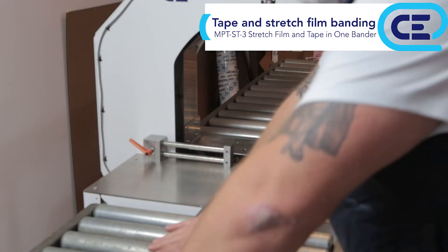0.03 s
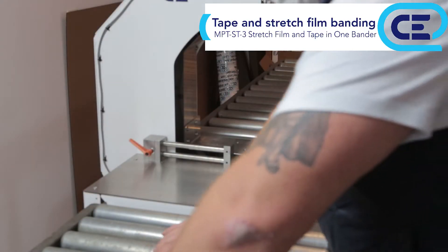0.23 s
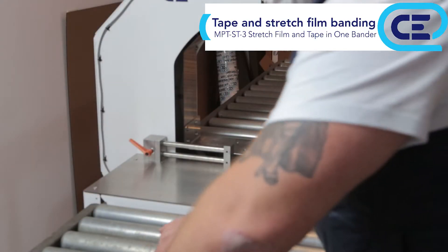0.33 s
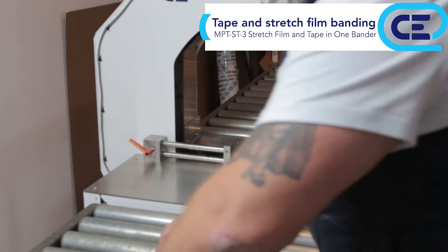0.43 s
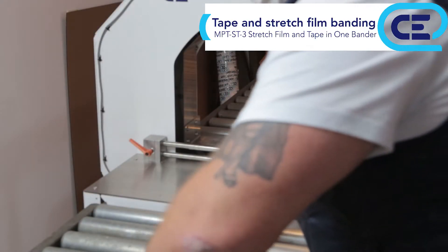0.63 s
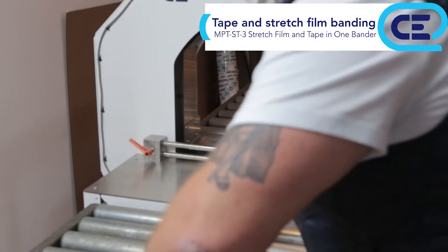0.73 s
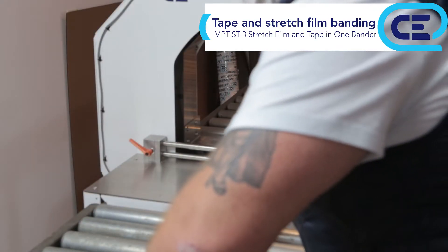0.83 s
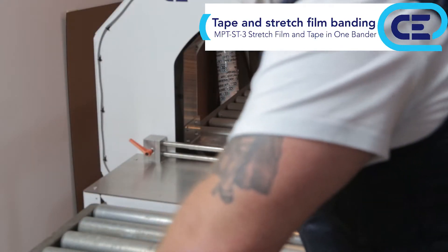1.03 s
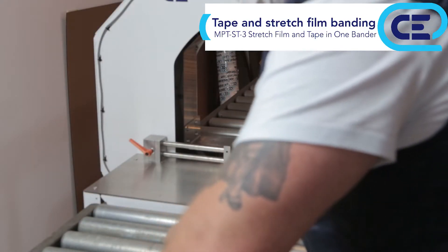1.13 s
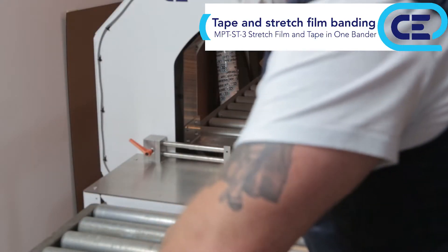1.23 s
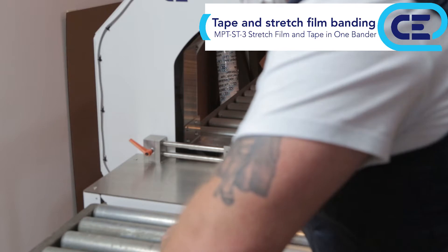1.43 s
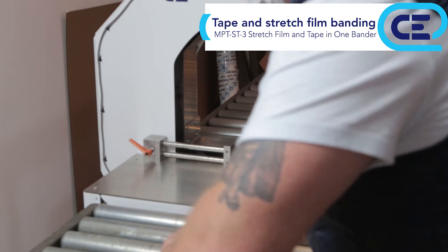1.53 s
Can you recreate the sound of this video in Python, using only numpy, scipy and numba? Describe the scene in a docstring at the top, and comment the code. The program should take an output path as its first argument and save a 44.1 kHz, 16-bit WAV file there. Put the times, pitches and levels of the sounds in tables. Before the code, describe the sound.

Sharp metal clacks come quickly from a nearby banding machine, ending in a loud blow. A load rubs and knocks on a roller conveyor, then more clacks and a faint rattle sound over the hard-walled workshop's low hum.

```python
"""In a hard-walled workshop, close to a banding machine, metal parts clack in three bursts.
Each impact excites the damped modes of panels and frame; heavy blows set a steel tube ringing.
Light ticks and the pings of a small steel part fall between, and a loose fitting rattles near the end.
A load rubs and knocks along a roller conveyor over a low motor hum and steady air noise.
The hall reverberates with the impacts, and a limiter ducks the sound after the hardest blow."""
import sys
import numpy as np
from scipy import signal
from scipy.fft import rfft, irfft
from scipy.io import wavfile
from scipy.ndimage import uniform_filter1d
from numba import njit

SR = 44100
rng = np.random.default_rng(int(sys.argv[2]) if len(sys.argv) > 2 else 0)


def transcribe(signal):
    """Save signal, clipped to [-1, 1], as a 16-bit WAV file at the path in sys.argv[1]."""
    frames = np.atleast_2d(signal).T
    limited = np.clip(frames, -1, 1)
    pcm = np.round(limited * 32767).astype(np.int16)
    wavfile.write(sys.argv[1], SR, pcm)


N = 70560
T = np.arange(N) / SR

# motor tones: (frequency [Hz], level [dB])
HUM_TONES = [(101, -85), (133, -58.5)]
# air noise: (frequency [Hz], relative density [dB])
AIR_SPECTRUM = [(20, 1), (55, 6.5), (110, 18.5), (220, 8), (330, -1.5), (1300, -18), (4000, 0.5),
                (8000, -8.5), (13000, -10.5), (16000, -26)]
# envelope of the sliding load: (time [s], level [dB])
SLIDE_ENVELOPE = [(0, -34.5), (0.04, -44), (0.075, -37), (0.15, -34.5), (0.28, -34), (0.42, -30.5),
                  (0.56, -42.5), (0.70, -42.5), (0.83, -41), (0.97, -52.5), (1.21, -51), (1.262, -32),
                  (1.40, -41), (1.53, -43.5), (1.6, -46)]
# friction noise: (frequency [Hz], relative density [dB])
SLIDE_SPECTRUM = [(100, -32), (300, -1), (650, 4), (1300, 4.5), (3000, 3.5), (6000, -7), (10000, -14),
                  (16000, -26)]
# metal impacts: (time [s], crack [dB], panel [dB], frame [dB], bass shelf [dB], treble shelf [dB])
CLACKS = [(0.1023, -41, -37, -33, -13, -22), (0.158, -22.5, -25, -23, 0, -8),
          (0.1628, -38, -24.5, -26, -15, 2.5), (0.1756, -14.5, -20.5, -20, -7, -5),
          (0.179, -28, -28.5, -31, -14, 9.5), (0.1925, -13.5, -19, -33, -7, 2),
          (0.1972, -11.5, -28.5, -21, 1.5, 0), (0.2428, -44, -31, -33, -14, 2.5),
          (0.249, -28.5, -33, -42, -14, 2), (0.2921, -21, -20, -18.5, -2.5, -1),
          (0.3209, -39, -26, -24, 5, 5.5), (0.3404, -47, -19.5, -24, 2, -4),
          (0.3656, -17, -13.5, -13, -4, -6.5), (0.3723, -31, -14.5, -25, -7, 1.5),
          (0.3765, -14, -16, -16.5, 0.5, -14), (0.396, 2.5, -8, -10.5, -0.5, 2),
          (1.2643, -35, -34.5, -50, 15.5, -7), (1.275, -22, -25, -44, 11.5, 14),
          (1.2838, -17.5, -27.5, -52, 4.5, 10), (1.3012, -21, -24.5, -44, -12, 2.5),
          (1.308, -18.5, -26, -19, -4, -17)]
# crack and panel ring: (frequency [Hz], relative density [dB])
CLACK_SPECTRUM = [(50, -57), (330, -18), (600, -20), (1000, -1), (1800, -3), (3000, 1.5), (4700, -4),
                  (8800, -10), (12000, -13.5), (16000, -25.5)]
# modes of the machine frame: (frequency [Hz], relative level [dB], T60 [s])
FRAME_MODES = [(1558, -2, 0.066), (1831, 5, 0.053), (2280, 6, 0.043), (2468, 2, 0.064), (2920, 1, 0.047),
               (2974, 10.5, 0.04), (3267, 5, 0.087), (3560, -9, 0.081), (3880, -3, 0.087), (4180, -2, 0.11),
               (5400, 0, 0.061), (7420, -9, 0.051)]
# reverberation: (frequency [Hz], relative density [dB])
ROOM_SPECTRUM = [(100, -11), (350, 1), (650, -1), (1400, 3), (3000, -1), (6000, 2), (9000, -4), (16000, -7)]
# resonances of the struck spots: (time [s], level [dB], centre frequency [Hz])
SPOT_RESONANCES = [(0.158, -29, 3370), (0.1752, -21, 890), (0.196, -13, 3360), (0.1972, -30, 860),
                   (0.396, -12, 649), (0.3962, -5, 2300), (1.275, -22, 646), (1.281, -20, 1020),
                   (1.3005, -35, 3260), (1.308, -16, 2930)]
# blows on the tube: (time [s], level [dB])
TUBE_BLOWS = [(0.397, -41), (1.308, -31)]
# modes of the tube: (frequency [Hz], relative level [dB], T60 [s])
TUBE_MODES = [(1810, -2, 2.2), (1913, 2, .5), (2664, 2.5, .38), (2798, -.5, .3), (2930, -4, .3),
              (5138, 2, .28)]
# light contacts: (time [s], level [dB])
TICKS = [(0.492, -27.5), (0.498, -29.5), (0.785, -27), (0.868, -23.5), (1.167, -36.5), (1.1902, -29),
         (1.245, -26), (1.5652, -30.5)]
# a light contact: (frequency [Hz], relative density [dB])
TICK_SPECTRUM = [(200, -26), (1000, -8), (2200, -0.5), (4000, 4), (7000, 4.5), (9500, 2), (13000, -1.5),
                 (16000, -15)]
# blows on the small steel part: (time [s], ring level [dB], tick level [dB], pitch [ratio])
PINGS = [(0.7213, -45, -28, 0.95), (0.7243, -26, -48, 1.02), (0.8968, -28, -26, 0.982),
         (0.930, -37.5, -32, 0.985)]
# modes of the small part: (frequency [Hz], relative level [dB], T60 [s])
PING_MODES = [(2262, 4, 0.045), (4090, -3, 0.042), (6120, 2.5, 0.037), (6540, -9, 0.098),
              (8130, -1.5, 0.033), (9600, -6, 0.036), (11400, -11, 0.055), (14200, -16, .05)]
# contacts of load and conveyor: (time [s], level [dB])
KNOCKS = [(0.751, -28.5), (0.759, -30.5), (0.793, -36), (0.838, -35.5), (0.867, -25.5), (0.88, -42),
          (1.332, -25), (1.352, -26.5)]
# a dull knock: (frequency [Hz], relative density [dB])
KNOCK_SPECTRUM = [(100, 1), (350, -3), (650, 0.5), (1500, 1.5), (3500, -2), (7000, -13), (16000, -35)]
# contacts of the loose fitting: (time [s], level [dB])
RATTLES = [(1.137, -54), (1.426, -42), (1.486, -36.5), (1.515, -39), (1.539, -36), (1.553, -38),
           (1.565, -34)]
# resonances of the fitting: (frequency [Hz], relative density [dB])
RATTLE_SPECTRUM = [(500, -28), (2200, -1), (4200, -5), (5400, 0.5), (7500, 6), (9000, -1.5), (16000, -10)]


def undb(db):
    """Amplitude ratio of a level in decibels."""
    return 10 ** (np.asarray(db) / 20)


def decay(t60, hold_s=0):
    """Exponential decay: unity until hold_s, then 60 dB down in every t60 seconds."""
    return np.exp(-np.log(1000) * np.maximum(T - hold_s, 0) / t60)


def at(start, x):
    """Time shift of a sound to its onset."""
    return np.concatenate([np.zeros(int(start * SR)), x])[:N]


def butterworth(x, order, hz, kind):
    """Filtering with a maximally flat passband."""
    return signal.sosfilt(signal.butter(order, hz, kind, fs=SR, output="sos"), x)


def match_energy(x, envelope):
    """Normalisation of a burst to the energy of an envelope."""
    return x * np.sqrt(np.sum(envelope ** 2) / np.sum(x ** 2))


def wander(rate_hz):
    """Smooth random fluctuation of unit standard deviation."""
    width = int(SR / rate_hz)
    steps = np.repeat(rng.standard_normal(N // width + 1), width)
    smooth = uniform_filter1d(uniform_filter1d(steps, width), width)[:N]
    return smooth / smooth.std()


def noise(spectrum):
    """Spectral shaping of white noise, at an rms near 1."""
    hz, db = np.array(spectrum).T
    gain = undb(np.interp(np.log(np.fft.rfftfreq(N, 1 / SR) + 1), np.log(hz), db))
    gain /= np.sqrt(np.mean(gain ** 2))
    return irfft(rfft(rng.standard_normal(N)) * gain, N)


def dense_ring(spectrum, t60, damping):
    """Overlapping modes act as decaying noise; t60 holds at 2 kHz and goes as frequency ** -damping."""
    bins = rfft(noise(spectrum))
    octave = np.clip(np.log2((np.fft.rfftfreq(N, 1 / SR) + 1) / 2000), -3, 3)
    out = 0
    for k in range(-3, 4):
        band = irfft(bins * np.maximum(1 - abs(octave - k), 0), N)
        out += band * decay(t60 * 2 ** (-k * damping))
    return out


def ring(modes, detune=0):
    """Modal superposition: damped sinusoids of random phase, with an initial rms near 1."""
    out = 0
    for hz, db, t60 in modes:
        hz *= 1 + detune * rng.standard_normal()
        out += undb(db) * decay(t60) * np.sin(2 * np.pi * (hz * T + rng.random()))
    return out / np.sqrt(sum(undb(db) ** 2 for _, db, _ in modes) / 2)


def air(level_db=-49.5):
    """Stationary broadband noise of the air, strongest in the bass."""
    return undb(level_db) * noise(AIR_SPECTRUM)


def motor_hum(drift_hz=4.76, waver_db=4.5):
    """Random frequency and amplitude modulation makes the motor's tones waver."""
    out = 0
    for hz, db in HUM_TONES:
        phase = 2 * np.pi * np.cumsum(hz + drift_hz * wander(15)) / SR
        out += np.sqrt(2) * undb(db + waver_db * wander(15.5)) * np.sin(phase)
    return out


def sliding_load(roughness_db=2):
    """Uneven sliding friction on the conveyor radiates noise of fluctuating level."""
    times, db = np.array(SLIDE_ENVELOPE).T
    return noise(SLIDE_SPECTRUM) * undb(np.interp(T, times, db) + roughness_db * wander(rate_hz=130))


def clacks(bass_hz=1090, treble_hz=6400):
    """Impact excitation: metal meets metal with a crack, then panels and frame vibrate freely."""
    contact = decay(t60=0.0049, hold_s=0.0012)
    out = 0
    for start, crack_db, panel_db, frame_db, bass_db, treble_db in CLACKS:
        crack = undb(crack_db) * match_energy(noise(CLACK_SPECTRUM) * contact, contact)
        panel = undb(panel_db) * dense_ring(CLACK_SPECTRUM, t60=0.095, damping=0.084)
        frame = undb(frame_db) * ring(FRAME_MODES, detune=0.006)
        blow = crack + panel + frame
        bass_shelf = (undb(bass_db) - 1) * butterworth(blow, 1, bass_hz, "low")
        treble_shelf = (undb(treble_db) - 1) * butterworth(blow, 1, treble_hz, "high")
        out += at(start, blow + bass_shelf + treble_shelf)
    return butterworth(out, 2, 170, "high")


def workshop_echo(x, build_s=0.0012):
    """Diffuse reverberation: convolution with the hall's impulse response, scaled to unit energy."""
    response = dense_ring(ROOM_SPECTRUM, t60=0.76, damping=0.29) * (1 - np.exp(-T / build_s))
    return signal.fftconvolve(x, response / np.sqrt(np.sum(response ** 2)))[:N]


def spot_resonances(width_octaves=0.61):
    """Heavy damping broadens a resonance: struck panels give brief hollow knocks and bright bites."""
    envelope = decay(t60=0.023)
    out = 0
    for start, db, hz in SPOT_RESONANCES:
        edges_hz = hz * 2 ** (np.array([-0.5, 0.5]) * width_octaves)
        burst = butterworth(rng.standard_normal(N) * envelope, 3, edges_hz, "band")
        out += at(start, undb(db) * match_energy(burst, envelope))
    return out


def steel_tube(touch_s=1.58):
    """Lightly damped modes ring on after heavy blows until a touch adds damping."""
    ringing = sum(at(start, undb(db) * ring(TUBE_MODES)) for start, db in TUBE_BLOWS)
    return ringing * decay(t60=0.3, hold_s=touch_s)


def tick(tail_db=-9.5):
    """A short contact has a wide spectrum: one bright click with a faint tail."""
    return noise(TICK_SPECTRUM) * (decay(t60=0.011) + undb(tail_db) * decay(t60=0.078))


def pings():
    """Free vibration of a small steel part after a tick; its pitch depends on how it is held."""
    out = 0
    for start, ring_db, tick_db, pitch in PINGS:
        modes = [(hz * pitch, db, t60) for hz, db, t60 in PING_MODES]
        out += at(start, undb(ring_db) * ring(modes) + undb(tick_db) * tick())
    return out


def knocks(attack_s=0.0012):
    """Soft contacts excite little treble: the load knocks dully on the conveyor."""
    envelope = (1 - np.exp(-T / attack_s)) * decay(t60=0.092)
    out = sum(at(start, undb(db) * noise(KNOCK_SPECTRUM) * envelope) for start, db in KNOCKS)
    return butterworth(out, 2, 374, "high")


def rattles(attack_s=0.00055):
    """Intermittent contact excites the broad resonances of a loose fitting."""
    envelope = (1 - np.exp(-T / attack_s)) * decay(t60=0.077)
    return sum(at(start, undb(db) * noise(RATTLE_SPECTRUM) * envelope) for start, db in RATTLES)


def scene(heavy_echo_db=-14.5, light_echo_db=-16):
    """Superposition of the direct sounds and the echo of the impacts at one microphone."""
    heavy = clacks() + spot_resonances() + knocks()
    ticks = sum(at(start, undb(db) * tick()) for start, db in TICKS)
    light = ticks + pings() + rattles()
    echo = workshop_echo(undb(heavy_echo_db) * heavy + undb(light_echo_db) * light)
    return (heavy + light + echo + steel_tube() + sliding_load() + air() + motor_hum())[None]


@njit
def peak_envelope(rectified, attack_s, release_s):
    """Envelope detection: a first-order lag with separate rise and fall time constants."""
    attack = 1 - np.exp(-1 / (attack_s * SR))
    release = 1 - np.exp(-1 / (release_s * SR))
    out, level = np.empty(len(rectified)), 0.0
    for i, sample in enumerate(rectified):
        level += (sample - level) * (attack if sample > level else release)
        out[i] = level
    return out


def record(dry, threshold_db=-2.5, cutoff_hz=15900):
    """Peak limiting lowers the gain after the hardest blow; overshoot clips, and the top is cut."""
    peak = peak_envelope(np.abs(dry[0]), attack_s=0.00016, release_s=0.2)
    reduction = np.maximum(peak / undb(threshold_db), 1)
    limited = np.clip(dry / reduction, -1, 1)
    return signal.sosfilt(signal.ellip(10, 0.2, 85, cutoff_hz, fs=SR, output="sos"), limited)


dry = scene()
out = record(dry)
transcribe(out)
```